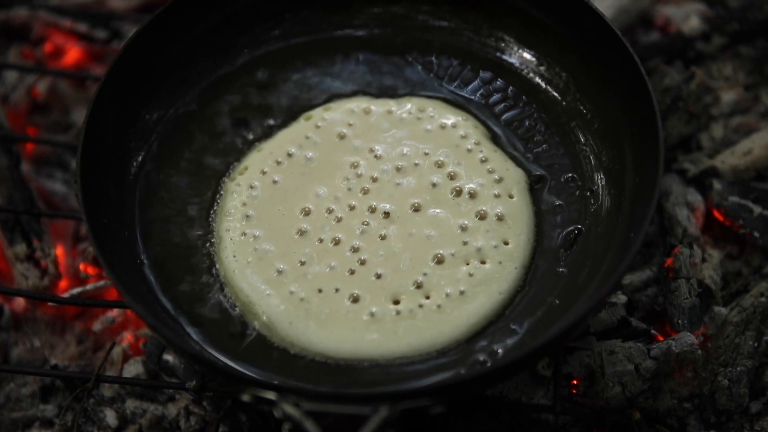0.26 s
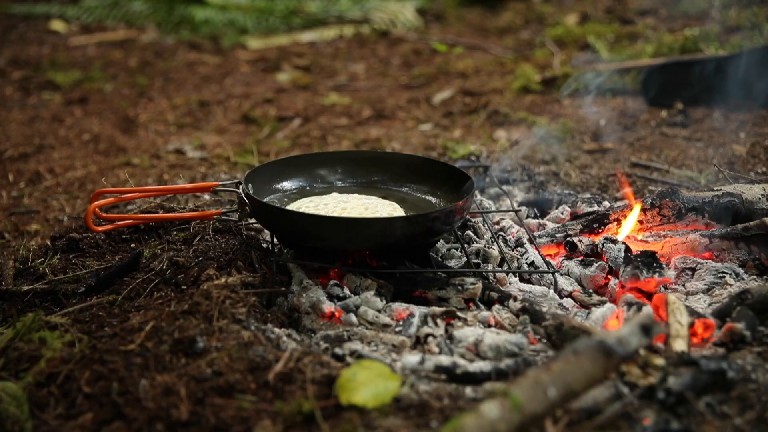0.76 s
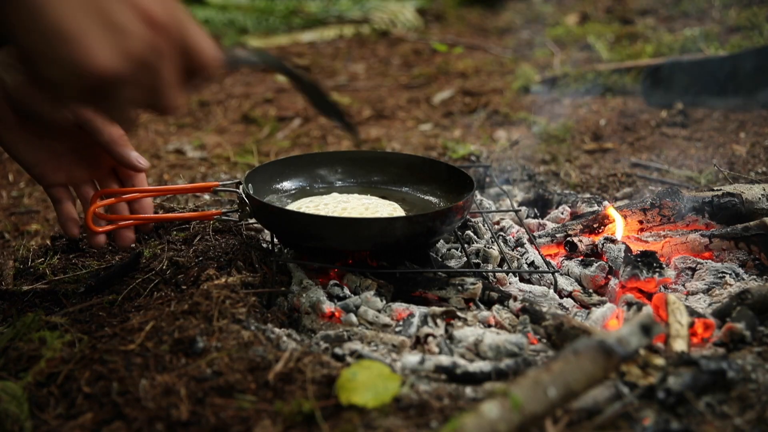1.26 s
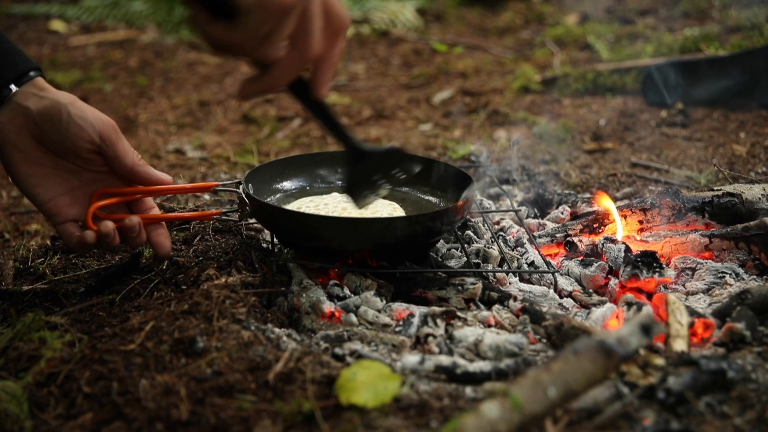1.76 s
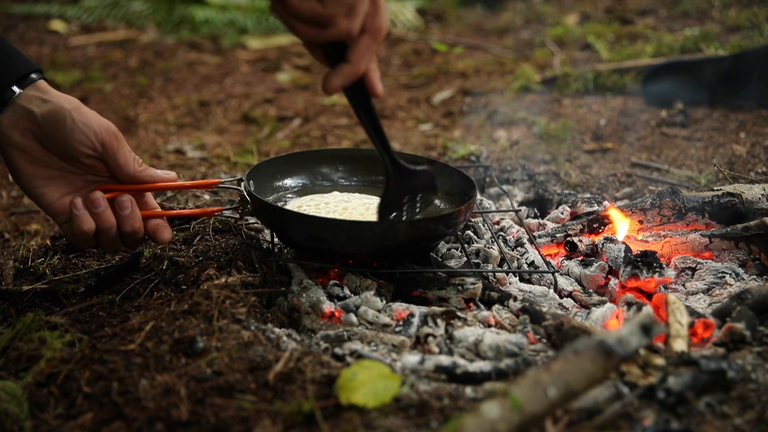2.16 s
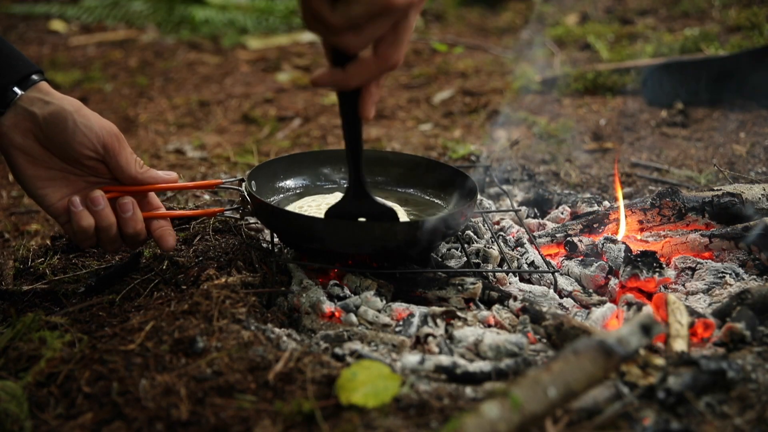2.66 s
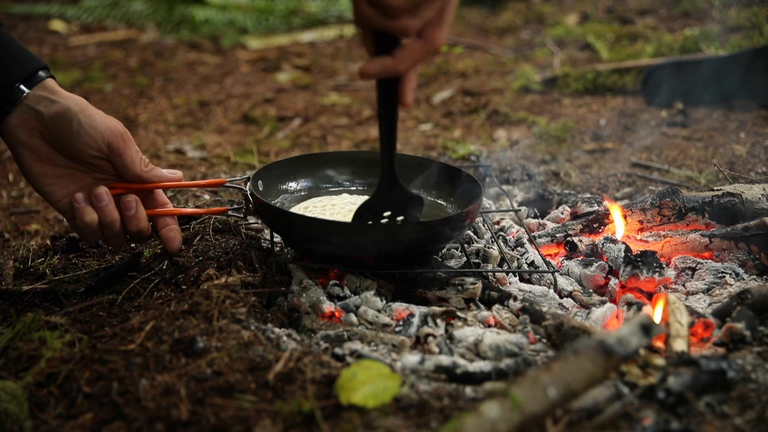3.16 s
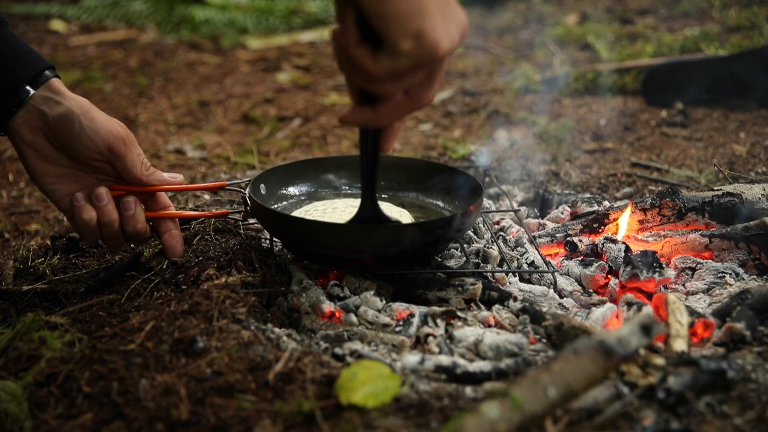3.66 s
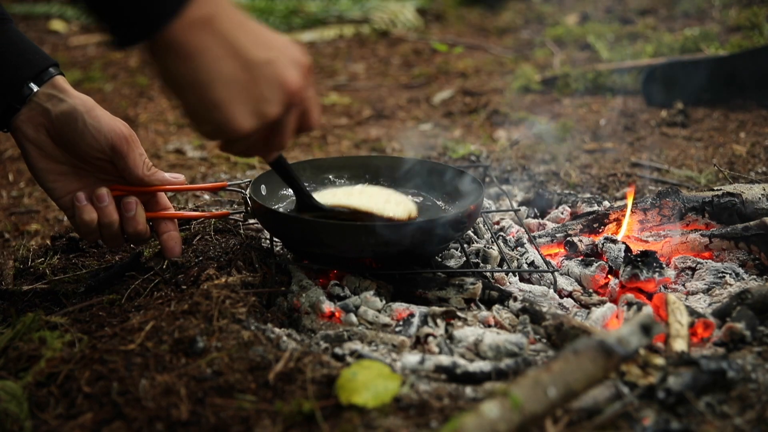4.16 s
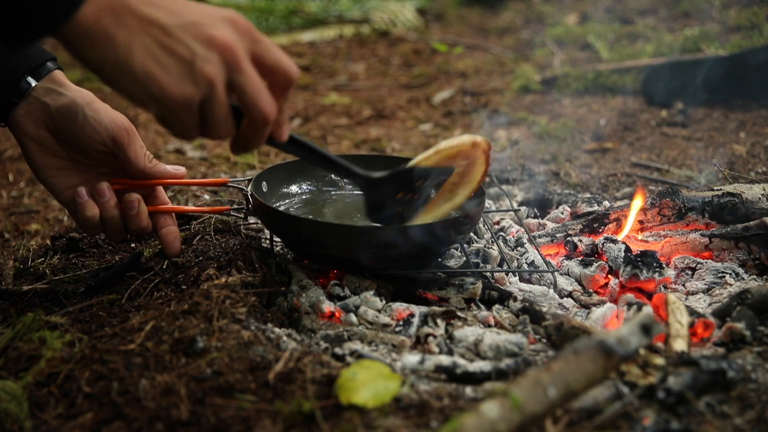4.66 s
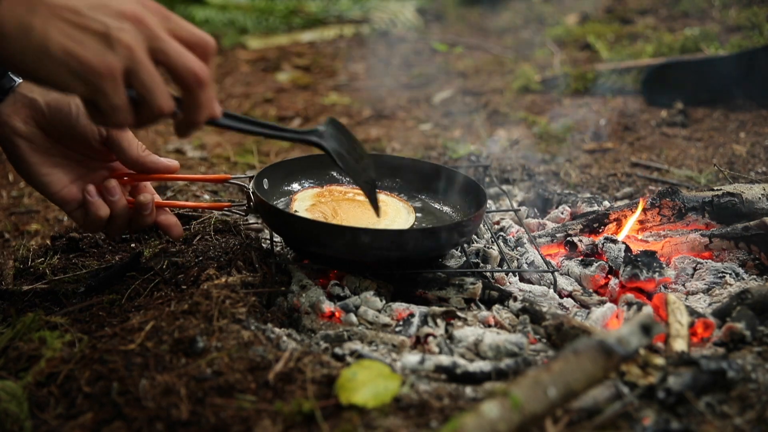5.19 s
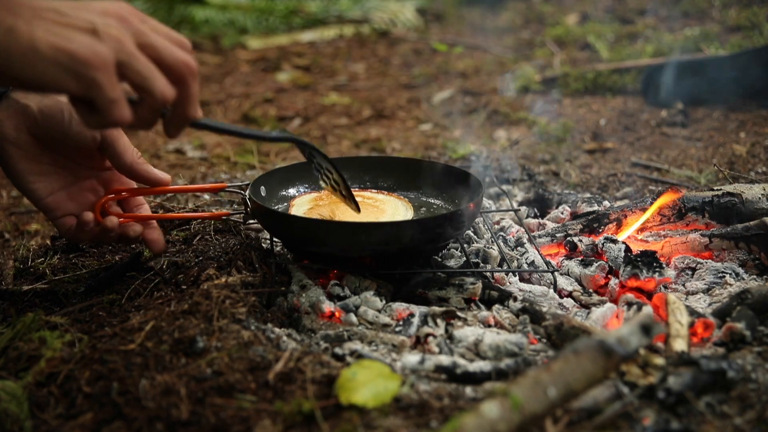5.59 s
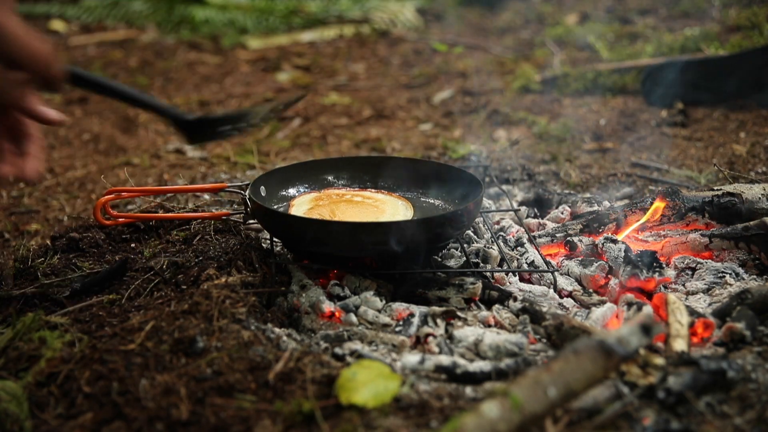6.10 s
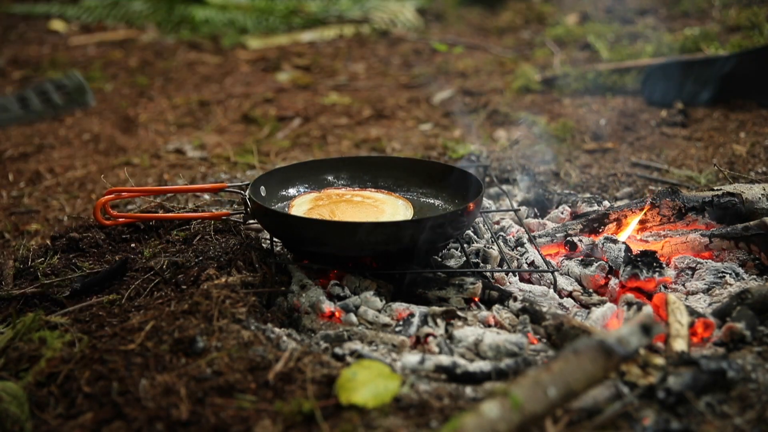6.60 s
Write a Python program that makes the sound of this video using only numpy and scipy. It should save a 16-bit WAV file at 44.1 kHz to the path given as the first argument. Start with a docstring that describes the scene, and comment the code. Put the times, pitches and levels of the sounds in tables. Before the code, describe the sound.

Close and nearly mono, outdoors by a campfire. From 0 to 0.85 s, fine quiet fizz from batter in a small pan, with a deep low throb swelling around 0.3 s, soft flame rush and tiny ember pops near 0.3 and 0.6 s. Then a wider quiet: faint simmer, fire ticks and barely audible hum. At 1.6 s a hard spatula knock rings the pan. From 2 s light taps and scrapes, a faint squeak at 2.3 s, small pops and a sizzle flare at 2.5 to 2.7 s. A gentle slide near 2.85 s, a short squeak at 3.1 s, then dense spatter, sharp pops and scraping from 3.3 to 4 s, with a knock and squeak at 3.75 s. Sizzle dulls and thins around 4.1 s; high spits ring until 5 s, strongest near 4.7 s. At 5.05 s a wet slap, then a bright sizzling surge peaking around 5.2 s, slowly fading with occasional pops until 7 s.

```python
"""Campfire pancake

A pancake fries in a small pan on the embers of a forest campfire, close to a nearly mono microphone.
Random bursts through bubbling and fizz filters make the frying; batter spatters, fat pops and spits ring.
Struck and rubbed resonances make a plastic spatula that knocks, scrapes, slides and squeaks.
The flipped pancake slaps down as clustered clicks in a fresh surge of sizzle.
Filtered noise and ringing ember pops make the fire; wavering sines make a faint hum and a deep throb.
"""
import sys
import numpy as np
from scipy import signal
from scipy.fft import rfft, irfft
from scipy.io import wavfile
from scipy.ndimage import uniform_filter1d, map_coordinates

SR = 44100
rng = np.random.default_rng(int(sys.argv[2]) if len(sys.argv) > 2 else 0)


def master(y):
    """Save y as 16-bit WAV."""
    cut = np.clip(np.atleast_2d(y).T, -1, 1)
    pcm = np.round(cut * 32767)  # scale
    wavfile.write(sys.argv[1], SR, pcm.astype(np.int16))


N = 301644
T = np.arange(N) / SR

# dry pops of steam bursting through fat: (time [s], level [dB], treble [dB])
STEAM_POPS = [(1.7074, -36, -7), (2.3883, -31, -5), (2.422, -37.5, -4), (2.4655, -38, -5),
              (2.5256, -24.5, -9), (2.6265, -34, -2), (2.6673, -27, -13), (2.745, -33, -5),
              (2.8568, -32, -9), (3.3809, -19.5, -4), (3.3889, -19, -1), (3.5125, -24, -6),
              (3.5841, -23, -3), (3.5971, -23, -5), (3.8047, -21.5, -3), (3.8515, -24, -11),
              (3.8807, -24, -12), (3.8852, -24, -12), (3.9225, -25, -6), (3.9765, -24.5, -14),
              (3.9802, -27, -4), (4.065, -28, -16), (4.261, -30, -1), (4.378, -34, -1), (5.0907, -15, -7),
              (5.3055, -18.5, -10), (5.7481, -24, -3)]
# spits of fat that ring at one pitch: (time [s], level [dB], pitch [Hz])
FAT_SPITS = [(3.5503, -26, 4540), (3.6887, -17, 12070), (4.334, -36, 7300), (4.385, -30.5, 8500),
             (4.459, -33, 7650), (4.4906, -33, 11300), (4.6035, -31.5, 5960), (4.6822, -20, 2840),
             (4.7, -29.5, 5940), (4.7054, -31.5, 10300), (4.7723, -18.5, 4540), (4.9174, -23.5, 4580),
             (4.9616, -31.5, 10000), (5.0356, -33, 6150), (5.9366, -28.5, 6330)]
# the spatula touching the pan: (time [s], length [s], pan ring [dB], soft thud [dB], rasp [dB])
SPATULA_TOUCHES = [(1.696, 0.004, -41.5, -60, -55), (1.966, 0.029, -44, -46, -63),
                   (2.043, 0.011, -50, -35, -53), (2.182, 0.022, -42.5, -47.5, -45),
                   (2.278, 0.0052, -38.5, -46.5, -42.5), (2.318, 0.017, -43, -60, -41),
                   (2.849, 0.0095, -40.5, -68, -53), (3.107, 0.015, -36.5, -50, -35.5),
                   (3.312, 0.052, -69, -66.5, -39), (3.505, 0.027, -30, -42.5, -34.5),
                   (3.716, 0.0046, -26.5, -32, -20), (3.73, 0.044, -37.5, -41, -34),
                   (3.763, 0.012, -28.5, -37, -42), (4.16, 0.0064, -55, -65, -28),
                   (4.404, 0.0034, -39, -48.5, -63)]
# modes of the pan, damped by the embers it sits on: (pitch [Hz], width [Hz], level [dB])
PAN_MODES = [(370, 175, 1.5), (550, 110, 2), (632, 35, 10), (930, 96, 4.5), (1230, 110, 4),
             (1626, 250, 1.5), (2350, 63, 1), (3220, 310, -5.5)]
# spectrum of the coarse bubbling: (frequency [Hz], level [dB])
BUBBLING_SPECTRUM = [(100, -16), (500, -17.5), (1000, -12), (1900, -11), (2900, -6), (3900, -2), (5200, -3),
                     (6500, -11.5), (9000, -12.5), (16000, -26)]
# spectrum of the fine fizz: (frequency [Hz], level [dB])
FIZZ_SPECTRUM = [(500, -21.5), (6000, -3.5), (7200, -4.5), (8000, -1.5), (10800, 2), (12100, -0.5),
                 (13700, 0.5), (15500, -5), (16000, -19.5)]
# the pan rocking on its bed of embers: (pitch [Hz], width [Hz], level [dB])
THUD_MODES = [(101, 26, 0.5), (163, 44, -1.5), (246, 73, -3.5)]
# spectrum of the flames and forest air: (frequency [Hz], level [dB])
FIRE_SPECTRUM = [(20, -1), (75, -3.5), (200, -7.5), (600, -7.5), (1050, -7.5), (2000, -12.5), (5000, -21),
                 (16000, -26)]
# small pops in the embers: (time [s], level [dB], pitch [Hz])
EMBER_POPS = [(.333, -37, 754), (0.574, -38.5, 1100), (.591, -39, 1000), (1.328, -42, 5250)]
# the blade squeaking on the metal: (loudest time [s], level [dB], pitch [Hz], half length [s])
BLADE_SQUEAKS = [(2.321, -44, 2850, 0.015), (3.112, -29.5, 5080, 0.005), (3.744, -19, 5200, 0.0031)]
# fat or wet batter meets hot metal, flares up and boils off; a negative fade goes on growing:
# (time of full height [s], bubbling [dB], fizz [dB], fade [dB/s])
SIZZLE_SURGES = [(2.09, -61, -54, -1), (2.57, -46, -40, 44), (2.68, -43.5, -39.5, 71),
                 (3.368, -36, -34, 64), (3.56, -33.5, -42, 70), (3.63, -38, -34.5, 43),
                 (3.86, -33.5, -54, 89), (4.18, -47.5, -41, 73), (5.09, -34, -36.8, 3.5),
                 (5.209, -30.5, -29, 12.5), (6.5, -39.5, -40, 23)]
# strokes of the blade over the greasy pan: (loudest time [s], level [dB], half length [s])
BLADE_STROKES = [(2.85, -47.5, 0.3), (3.36, -36, 0.034)]
# the bare pan, which rings on while the pancake is in the air: (pitch [Hz], width [Hz], level [dB])
BARE_PAN_MODES = [(638, 8.5, 4), (923, 38, 3.5), (4520, 60, 2.5)]
# hard knocks of the spatula's edge: (time [s], level [dB])
EDGE_KNOCKS = [(1.607, -22.5), (3.763, -29)]
# what the spatula and the pan ring with when knocked: (pitch [Hz], width [Hz], level [dB])
KNOCK_RING_MODES = [(207, 32, 3.5), (565, 55, 5), (1670, 150, 4.5), (3430, 400, -5.5), (3880, 50, -3)]
# the wet side of the pancake slapping down, edge first: (time [s], level [dB], fade [dB/s])
BATTER_SLAPS = [(5.033, -36, 400), (5.05, -26, 220), (5.077, -23, 1100)]

# the quiet simmer; the microphone starts right above the pan, where more fizz reaches it
SIMMER_DB, SIMMER_FIZZ_DB, CLOSE_FIZZ_DB = -51, -58.5, -52.5
CLOSE_UNTIL_S = 0.844
SURGE_RISE_S, SURGE_RISE_POWER = .08, 1.4
# the harder the fat boils, the more often it spatters: the rate doubles every so many dB of bubbling
SPATTER_PER_S, SPATTER_DOUBLING_DB = 70, 11
# spatter against the frying: it grows as the blade digs under the pancake and dies back after the lift
SPATTER_REST_DB, SPATTER_DIG_DB = -11.5, 7
LIFT_S, DIG_DB_PER_S, SETTLE_DB_PER_S = 4.1, 9, 16
# fire and forest air
AIR_DB = -51
# a deep throb that swells and fades while the microphone is above the pan
THROB_HZ, THROB_DB, THROB_PEAK_S = 14, -21, 0.31
THROB_RISE_DB_PER_S, THROB_FADE_DB_PER_S = 30, 23
# the hum, which steps up smoothly part of the way through
HUM_HZ, HUM_DB = 99.8, -62.5
HUM_SWELL_DB, HUM_SWELL_S, HUM_SWELL_HALF_LENGTH_S = 5, 4.05, .4
# the blade's resonance at the peak of the first stroke, and how fast it sinks
SLIDE_HZ, SLIDE_SINK_OCTAVES_PER_S = 4570, 0.3
# how fast a slap strikes, and the raw side bubbling on underneath
SLAP_RISE_DB_PER_S, UNDERSIDE_DB = 3999, -52.5
# the spits lie a little to the left: left channel over right
SPITS_LEFT_DB = 0.4
# while the blade stands in the pan, the sizzle also bounces off it and sounds hollow
BLADE_IN_S, BLADE_OUT_S, BLADE_MOVE_S, BLADE_ECHO_DB = 2.07, 3.72, .1, -11
BLADE_LAG_S, BLADE_LAG_DRIFT = .00033, .025
# the lifted pancake covers the frying and shades its highest fizz
COVER_S, COVER_HALF_LENGTH_S, COVER_DB, COVER_HZ = 4.02, 0.23, -4.5, 11100
TOP_HZ = 16100


def undb(db):
    """Decibels to gain."""
    return 10 ** (np.asarray(db) / 20)


def unit(x):
    """Scale to rms 1."""
    return x / np.sqrt(np.mean(x ** 2) + 1e-18)


def add(out, s, sound):
    """Mix a short sound in at time s."""
    i = max(int(s * SR), 0)
    out[i:i + len(sound)] += sound[:N - i]


def butter(x, hz, kind="low"):
    """Second-order Butterworth filter."""
    return signal.sosfilt(signal.butter(2, hz, kind, fs=SR, output="sos"), x)


def colour(x, points, size=4096):
    """Minimum-phase filter with the given (frequency [Hz], level [dB]) spectrum and unit power gain."""
    hz, db = np.transpose(points)
    grid = np.maximum(np.fft.rfftfreq(size, 1 / SR), 1)
    level_db = np.interp(np.log(grid), np.log(hz), db)
    # folding the cepstrum forward makes the filter causal
    cepstrum = irfft(np.log(undb(level_db)))
    cepstrum[1:size // 2] *= 2
    cepstrum[size // 2 + 1:] = 0
    response = irfft(np.exp(rfft(cepstrum)))
    return signal.fftconvolve(x, response / np.linalg.norm(response))[:len(x)]


def ring(x, modes, size=4096):
    """Damped (pitch [Hz], width [Hz], level [dB]) modes driven by x, with unit power gain."""
    t = np.arange(size) / SR
    response = np.zeros(size)
    for k, (hz, width, db) in enumerate(modes):
        decay = np.exp(-np.pi * width * t)
        response += (-1) ** k * undb(db) * width * decay * np.sin(2 * np.pi * hz * t)
    return signal.fftconvolve(x, response / np.linalg.norm(response))[:len(x)]


def cavity(x, hz, share):
    """A steep-sided resonance, about share times its pitch wide, with roughly unit power gain."""
    share = min(share, 1)
    edges = hz * (1 + share) ** np.array([-.5, .5])
    return butter(x, edges, "bandpass") * np.sqrt(SR / 2 / (share * hz))


def walk(rate):
    """Smooth random drift with rms 1, taking about rate new values a second."""
    k = max(int(SR / rate), 1)
    steps = np.repeat(rng.standard_normal(N // k + 1), k)
    return unit(uniform_filter1d(steps, k)[:N])


def swell(peak_s, rise_db_per_s, fade_db_per_s):
    """A gain that climbs to 1 at peak_s and dies away again."""
    slope = np.where(T < peak_s, rise_db_per_s, fade_db_per_s)
    return undb(-np.abs(slope * (T - peak_s)))


def close_up():
    """1 while the microphone is right above the pan, 0 afterwards."""
    return uniform_filter1d((T < CLOSE_UNTIL_S) * 1., size=882)


def clicks(rate, spread_db):
    """Random impulses, many small and a few large, with rms 1."""
    chance = rng.random(N)
    size = np.minimum(rng.exponential(size=N), 4)
    sign = rng.choice([-1, 1], N)
    return unit((chance < rate / SR) * sign * undb(spread_db * size) / np.sqrt(rate))


def bubbles(rate, low_hz, high_hz, spread_db, cycles, size=256):
    """Random bursts, each a damped ring with its own pitch, decay and strength; rms 1."""
    chance = rate / SR * np.ones(N)
    starts = np.flatnonzero(rng.random(N - size) < chance[:N - size])
    pitch, damping, strength, turn = rng.random((len(starts), 4)).T[:, :, None]
    turns = low_hz * (high_hz / low_hz) ** pitch * np.arange(size) / SR
    decay = np.exp(-turns / (cycles * 10 ** (damping - .5)))
    grains = decay * np.sin(2 * np.pi * (turns + turn))
    gain = undb(-spread_db * np.log(strength + np.exp(-4)))
    grains *= gain / np.linalg.norm(grains, axis=1, keepdims=True)
    places = starts[:, None] + np.arange(size)
    out = np.bincount(places.ravel(), grains.ravel(), N)
    return unit(out / np.sqrt(rate))


def in_pan(x, rattle_s=0.003, rattle_db=-3, linger_s=0.0036, linger_db=-10, size=2048):
    """A burst scatters between the walls of the pan, then lingers briefly in the metal."""
    t = np.arange(size) / SR
    out = x.copy()
    for decay_s, db in ((rattle_s, rattle_db), (linger_s, linger_db)):
        # every burst has its own place in the pan, so its reflections have their own pattern
        fade = np.exp(-2 * t / decay_s) - np.exp(-10 * t / decay_s)
        power = signal.fftconvolve(x ** 2, fade / fade.sum())[:N]
        out += undb(db) * np.sqrt(np.abs(power)) * rng.standard_normal(N)
    return out / np.sqrt(1 + undb(rattle_db) ** 2 + undb(linger_db) ** 2)


def boiling():
    """Strength of the bubbling and of the fizz: the steady simmer plus every surge, summed in power."""
    bubbling = np.full(N, undb(SIMMER_DB) ** 2)
    fizz = undb(SIMMER_FIZZ_DB) ** 2 + close_up() * undb(CLOSE_FIZZ_DB) ** 2
    for s, bubbling_db, fizz_db, fade_db_per_s in SIZZLE_SURGES:
        rise = np.clip(1 + (T - s) / SURGE_RISE_S, 0, 1) ** SURGE_RISE_POWER
        flare = rise * undb(-fade_db_per_s * np.maximum(T - s, 0))
        bubbling = bubbling + (undb(bubbling_db) * flare) ** 2
        fizz = fizz + (undb(fizz_db) * flare) ** 2
    return np.sqrt(bubbling), np.sqrt(fizz)


def frying():
    """Thousands of tiny steam bubbles burst each second; sparser, larger ones spatter over them."""
    bubbling, fizz = boiling()
    heat_db = 20 * np.log10(bubbling) - SIMMER_DB
    rate = SPATTER_PER_S * 2 ** (heat_db / SPATTER_DOUBLING_DB)
    dig = undb(SPATTER_DIG_DB) * swell(LIFT_S, DIG_DB_PER_S, SETTLE_DB_PER_S)
    spatter = np.hypot(undb(SPATTER_REST_DB), dig)
    snaps = clicks(rate, spread_db=3)
    low_spatter = snaps + undb(-6) * bubbles(rate, 2500, 7000, spread_db=4, cycles=2)
    high_spatter = snaps + undb(-4) * bubbles(rate, 6500, 15000, spread_db=4, cycles=3)
    coarse = in_pan(clicks(rate=3500, spread_db=4.0) + spatter * low_spatter)
    fine_bubbles = bubbles(5000, 5440, 21600, spread_db=7.5, cycles=1.5)
    fine = in_pan(fine_bubbles + spatter * high_spatter)
    low_sizzle = bubbling * unit(colour(coarse, BUBBLING_SPECTRUM))
    high_sizzle = fizz * unit(colour(fine, FIZZ_SPECTRUM))
    seethe = undb(0.73 * walk(rate=35))
    return seethe * (low_sizzle + high_sizzle)


def campfire(pop_s=0.0018, pop_width_hz=800, size=2048):
    """The soft rush of the flames in the forest air, with embers ticking and popping."""
    rush = undb(AIR_DB + 1.0 * walk(rate=7.3)) * colour(rng.standard_normal(N), FIRE_SPECTRUM)
    crackle = undb(-58.5) * in_pan(clicks(rate=70, spread_db=3.5))
    for s, db, hz in EMBER_POPS:
        burst = rng.standard_normal(size) * np.exp(-np.arange(size) / SR / pop_s)
        pop = ring(burst, [(hz, pop_width_hz, 0)])
        add(rush, s, undb(db) * np.sqrt(2 * pop_s * SR) * pop / np.linalg.norm(pop))
    return rush + ring(crackle, [(940, 460, 0.0), (2660, 990, -8.5)])


def drone():
    """A faint wavering hum with a second harmonic, and a deep throb with a weak third harmonic."""
    step = (1 + np.tanh((T - HUM_SWELL_S) / HUM_SWELL_HALF_LENGTH_S)) / 2
    hum_db = HUM_DB + HUM_SWELL_DB * step
    hum_phase = 2 * np.pi * np.cumsum(HUM_HZ * (1 + 0.0148 * walk(rate=5.4))) / SR
    hum = undb(hum_db + walk(rate=5)) * (np.sin(hum_phase) + undb(-12) * np.sin(2 * hum_phase))
    throb_swell = swell(THROB_PEAK_S, THROB_RISE_DB_PER_S, THROB_FADE_DB_PER_S)
    throb_gain = undb(THROB_DB) * throb_swell * close_up()
    throb_phase = 2 * np.pi * np.cumsum(THROB_HZ * (1 + 0.055 * walk(rate=11.8))) / SR
    third = undb(-27 + 3 * walk(rate=10)) * np.sin(3 * throb_phase)
    throb = throb_gain * (np.sin(throb_phase) + third)
    return np.sqrt(2) * (hum + throb)  # a sine of rms 1 peaks at root 2


def knocks(crack_db=-12, tick_db=-12, chatter_db=-9, blow_s=.004):
    """A blow rings the spatula and the pan with a crack on top; the edge chatters briefly on the metal."""
    blows = np.zeros(N)
    for s, db in EDGE_KNOCKS:
        blows[int(s * SR)] = undb(db) * np.sqrt(blow_s * SR)
    chatter = in_pan(blows, rattle_s=.007, rattle_db=5)
    out = ring(blows, KNOCK_RING_MODES)
    out += undb(chatter_db) * ring(chatter, PAN_MODES)
    out += undb(crack_db) * colour(chatter, BUBBLING_SPECTRUM)
    return out + undb(tick_db) * colour(in_pan(blows), FIZZ_SPECTRUM)


def spatula(attack_s=0.00022, blow_s=0.0074, grit_db=-10, size=8192):
    """Each touch is a blow and a run of stick-slip catches: the pan rings and thuds, the crust rasps."""
    t = np.arange(size) / SR
    force = np.zeros((3, N))
    for s, length, *levels in SPATULA_TOUCHES:
        press = (1 - np.exp(-t / attack_s)) / np.sqrt(1 + (t / length) ** 6)
        blow = np.exp(-length / blow_s)  # short touches put most of their energy into the blow
        for row, db in zip(force, levels):
            catches = press * rng.standard_normal(size) * (rng.random(size) < 3500 / SR)
            scrape = catches / (np.linalg.norm(catches) + 1e-9)
            push = np.sqrt(blow) * (t == 0) + np.sqrt(1 - blow) * scrape
            add(row, s, undb(db) * np.sqrt(length * SR) * push)
    metal, thud, rasp = force
    crust = colour(rasp, BUBBLING_SPECTRUM) + undb(grit_db) * colour(rasp, FIZZ_SPECTRUM)
    return ring(metal, PAN_MODES) + ring(thud, THUD_MODES) + crust


def pops(burst_s=.004):
    """Single large bursts: a snap in the bubbling range, and more crack and high tick the brighter it is."""
    kicks = np.zeros((3, N))
    for s, db, treble_db in STEAM_POPS:
        bright = min(undb(treble_db), .97)
        dull = np.sqrt(1 - bright ** 2)
        shares = np.array([dull, dull * bright, bright ** 2])
        kicks[:, int(s * SR)] += undb(db) * np.sqrt(burst_s * SR) * shares
    snap, crack, tick = (in_pan(x, rattle_s=.0012, rattle_db=-1, linger_db=-11) for x in kicks)
    snap = colour(butter(snap, 1100, "high"), BUBBLING_SPECTRUM)
    return snap + colour(crack, FIZZ_SPECTRUM) + ring(tick, [(11300, 3100, 0)])


def squeaks():
    """The blade chatters for a few milliseconds at an unsteady pitch."""
    waver = np.cumsum(1 + 0.0183 * walk(rate=780)) / SR
    out = np.zeros(N)
    for s, db, hz, half_s in BLADE_SQUEAKS:
        envelope = np.exp(-((T - s) / half_s) ** 2)
        out += undb(db) * envelope * np.sin(2 * np.pi * hz * waver)
    return np.sqrt(2) * out


def slide(width_hz=450):
    """Fine catches of the sliding blade excite one resonance, which sinks as it goes under the pancake."""
    pressure = sum(undb(db) * np.exp(-((T - s) / half_s) ** 2) for s, db, half_s in BLADE_STROKES)
    hz = SLIDE_HZ * 2 ** (-SLIDE_SINK_OCTAVES_PER_S * (T - BLADE_STROKES[0][0]))
    # shift down by the moving pitch, low-pass, and shift back up: a resonance that glides
    swing = np.exp(2j * np.pi * np.cumsum(hz) / SR)
    held = butter(clicks(rate=160, spread_db=3.5) / swing, width_hz)
    return pressure * unit((held * swing).real)


def spits(body_db=-8, bare_db=-12, snap_db=-5, size=2048):
    """A drop snaps, its cavity rings, shorter if it bursts hard; the pan rings on, most after low ones."""
    t = np.arange(size) / SR
    out, kicks, snaps = np.zeros(N), np.zeros(N), np.zeros(N)
    burst_s, tail_s, tail_db, crack_db = .005, .007, -10, -22
    narrow_share, broadening = .11, 2.6  # cavity width over pitch, and its growth with the burst's gain
    for s, db, hz in FAT_SPITS:
        tail = rng.standard_normal(size) * np.exp(-t / tail_s) * (1 - np.exp(-10 * t / tail_s))
        push = (t == 0) + undb(tail_db) * tail / np.linalg.norm(tail)
        tone = cavity(push, hz, narrow_share + broadening * undb(db))
        gain = undb(db) * np.sqrt(burst_s * SR)
        bulk = 2800 / hz  # larger drops ring lower
        add(out, s, gain * (tone / np.linalg.norm(tone) + undb(crack_db) * push))
        add(snaps, s, gain * push * bulk ** 2)
        add(kicks, s, gain * (t == 0) * bulk ** 4)
    body = undb(body_db) * cavity(kicks, hz=1140, share=0.77)
    bare = undb(bare_db) * ring(kicks + out / 2, BARE_PAN_MODES)
    return out + undb(snap_db) * butter(snaps, [450, 4300], "bandpass") + body + bare


def landing():
    """Wet batter slaps on to the metal and squeezes out small pockets of air, then bubbles on quietly."""
    slaps = sum((undb(db) * swell(s, SLAP_RISE_DB_PER_S, fade)) ** 2 for s, db, fade in BATTER_SLAPS)
    underside = undb(UNDERSIDE_DB) ** 2 * (T > BATTER_SLAPS[-1][0])
    wet = [(60, -6), (400, -2.5), (700, 4), (1200, 3.5), (2600, -4.5), (12000, -18.0)]
    return np.sqrt(slaps + underside) * colour(clicks(rate=2800, spread_db=5), wet)


def round_the_blade(x):
    """An echo off the moving blade hollows the sound; then the raised pancake dulls it."""
    blade_in = np.tanh((T - BLADE_IN_S) / BLADE_MOVE_S)
    blade_out = np.tanh((T - BLADE_OUT_S) / BLADE_MOVE_S)
    share = undb(BLADE_ECHO_DB) * (blade_in - blade_out) / 2
    lag = BLADE_LAG_S * (1 + BLADE_LAG_DRIFT * walk(rate=5.99))
    echo = map_coordinates(x, [(T - lag) * SR])
    hollow = (x - share * echo) / np.sqrt(1 + share ** 2)
    low = signal.sosfiltfilt(signal.butter(2, COVER_HZ, fs=SR, output="sos"), hollow)
    cover = np.exp(-((T - COVER_S) / COVER_HALF_LENGTH_S) ** 2)
    return low + (hollow - low) * undb(COVER_DB * cover)


def scene():
    """All but the spits reach both channels alike; the spits lie slightly left."""
    fire = campfire() + drone()
    blade = knocks() + spatula() + squeaks() + slide()
    mono = round_the_blade(frying() + pops()) + fire + blade + landing()
    return mono + spits() * undb(np.array([[1], [-1]]) * SPITS_LEFT_DB / 2)


def record(dry):
    """Peaks are limited hard at full scale; the top is cut steeply."""
    steep = signal.ellip(10, .2, 70, TOP_HZ, fs=SR, output="sos")
    return signal.sosfilt(steep, np.clip(dry, -1, 1))


dry = scene()
out = record(dry)
master(out)
```